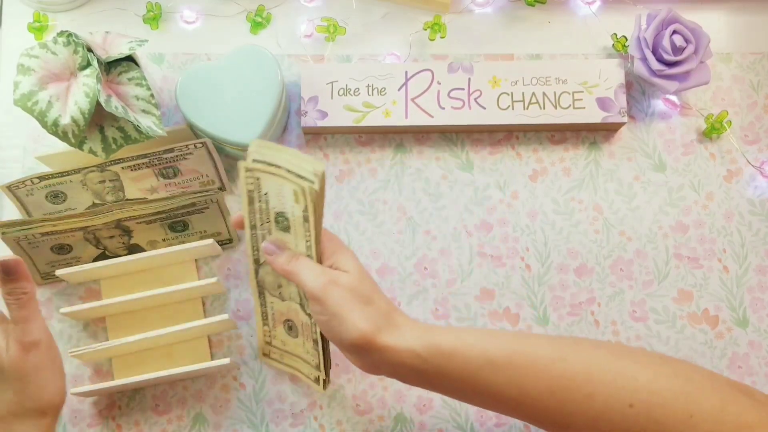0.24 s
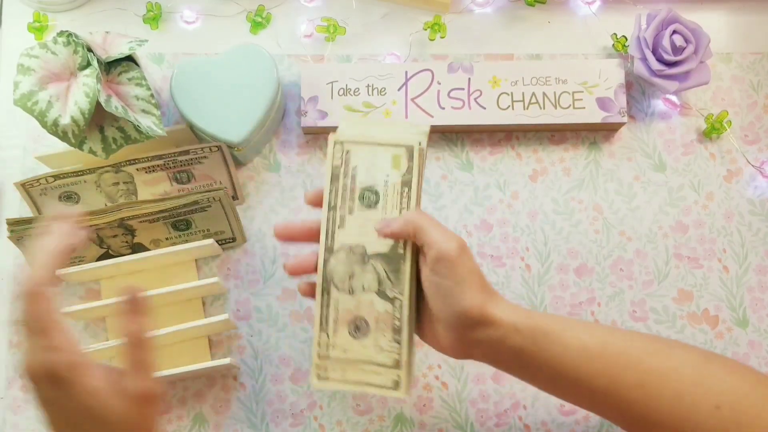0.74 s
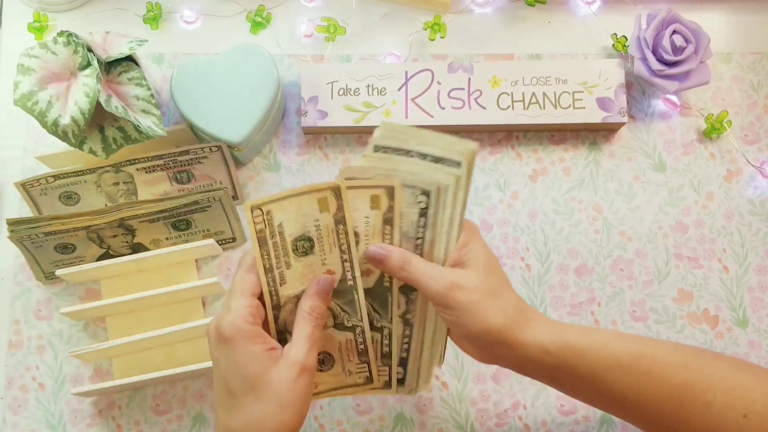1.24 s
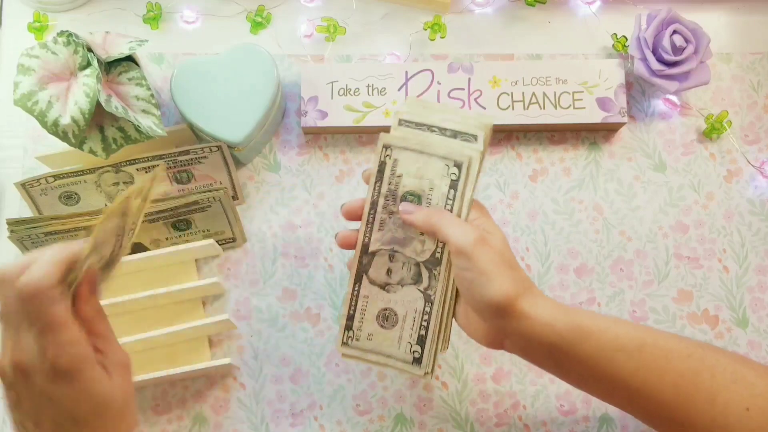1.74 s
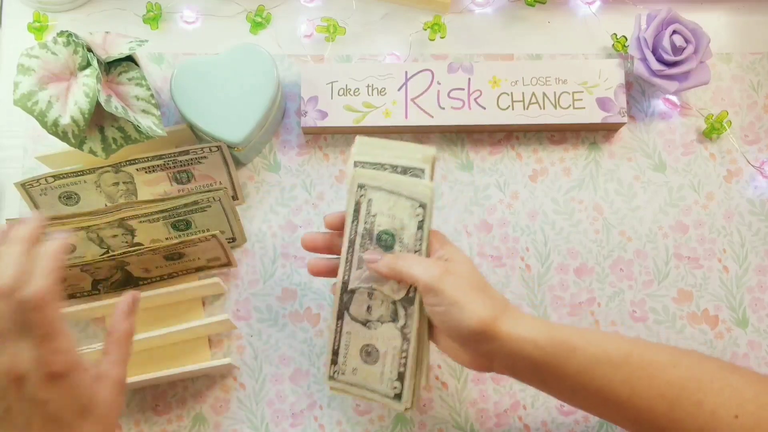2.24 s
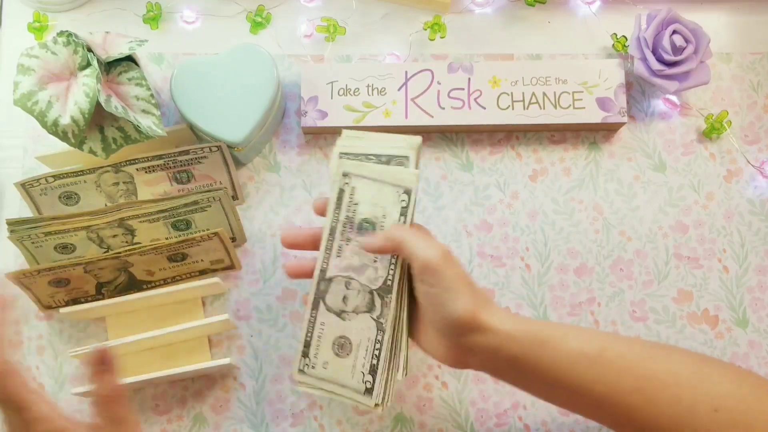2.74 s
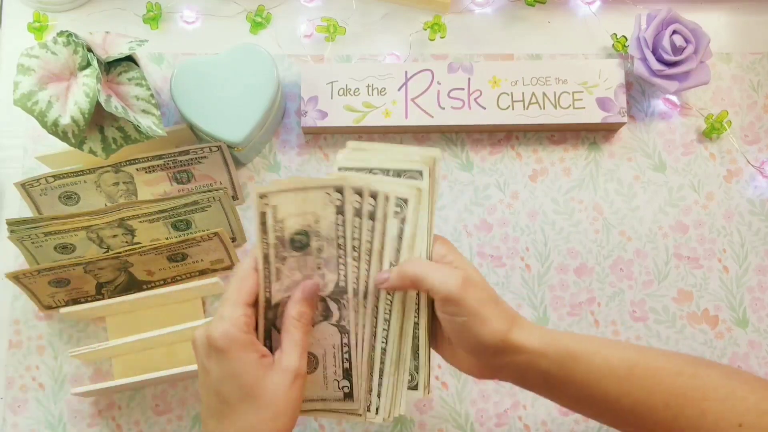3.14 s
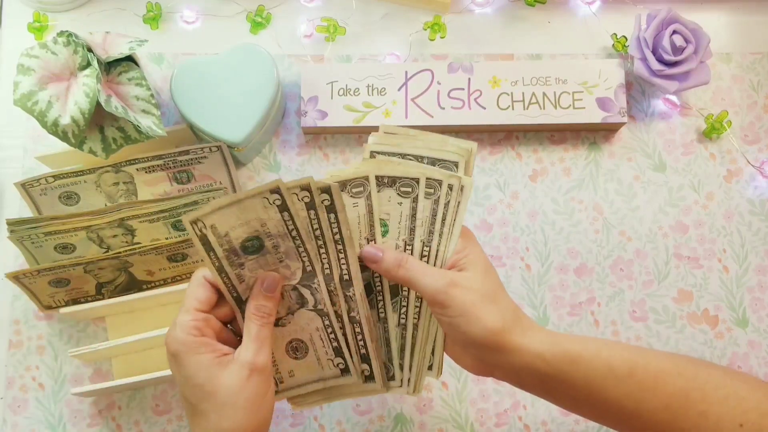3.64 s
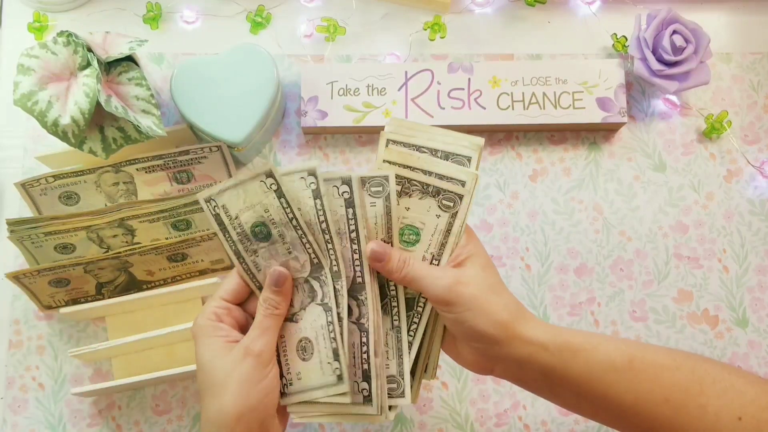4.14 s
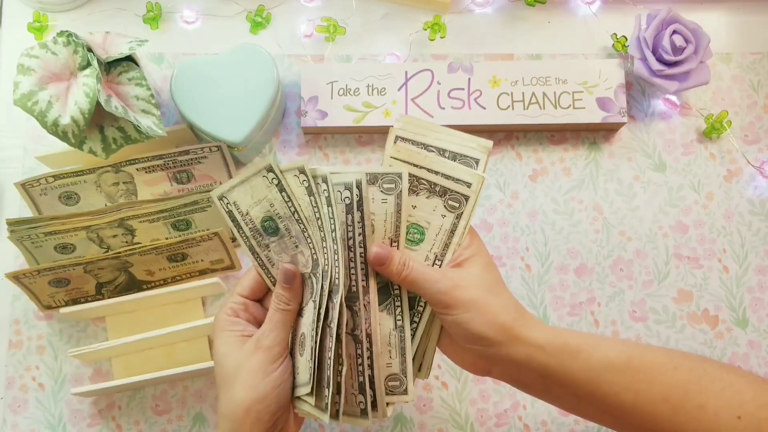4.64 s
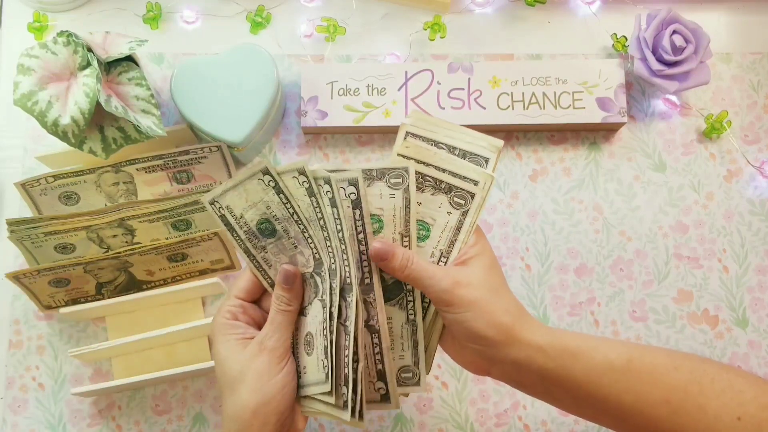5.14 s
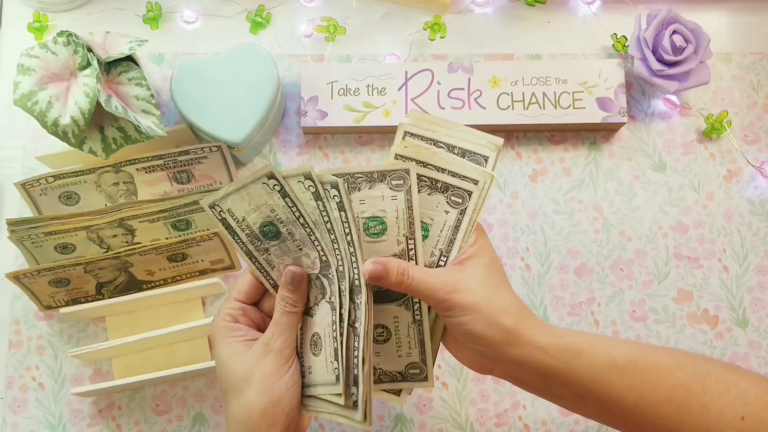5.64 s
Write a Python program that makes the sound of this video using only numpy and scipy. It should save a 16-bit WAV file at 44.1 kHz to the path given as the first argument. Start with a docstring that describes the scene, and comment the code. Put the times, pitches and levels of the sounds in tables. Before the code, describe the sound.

Close, quiet handling of paper money: dry rubs, a few soft table bumps, sharp little paper flicks, and a low fan-like hum behind.

```python
"""Hands fan out paper banknotes and drop some into a rack, close to a stereo microphone in a small room.
Throughout lie rumble, wavering hum and hiss, made of filtered noise and sines. First come faint slides and rubs:
friction as grainy, filtered noise. From 0.5 s to 0.9 s a hand bumps and brushes the table (damped sines, resonant
slips), with one thin tick. From 1.1 s sheets also snap, as struck resonances with a broadband crack: in bursts
near 1.6 s, 2.2 s and 4.1 to 4.5 s, and a last time at 5.8 s, while slides go on between them."""
import sys
import numpy as np
from scipy import signal
from scipy.fft import rfft, irfft
from scipy.io import wavfile

SR = 44100
rng = np.random.default_rng(int(sys.argv[2]) if len(sys.argv) > 2 else 0)


def generate_wav(sig):
    """Save sig (samples, or channels by samples) to the path in sys.argv[1] as 16-bit PCM at SR."""
    pcm = np.round(np.clip(np.atleast_2d(sig).T, -1, 1) * 32767).astype(np.int16)
    wavfile.write(sys.argv[1], SR, pcm)


N = 260190  # length in samples

# Filter spectrum of the fan-like rumble: (frequency [Hz], gain [dB])
RUMBLE_SPECTRUM = [(15, -20.5), (32, -34.5), (42, -18), (54, 0), (68, -0.5), (85, -13.5), (135, -15.5),
                   (190, -29.5), (255, -22.5), (370, -39.5), (700, -43), (1500, -51), (5000, -65)]
# Steady hum lines: (frequency [Hz], level [dB])
HUM_LINES = [(60, -61.5), (120, -65), (258, -78)]
# Filter spectrum of the microphone hiss: (frequency [Hz], gain [dB])
HISS_SPECTRUM = [(200, 20), (1000, -22), (3500, -11), (8500, -13), (12500, 8.5), (15000, 2)]
# Filter spectrum of the band of hiss in the left port: (frequency [Hz], gain [dB])
PORT_HISS_SPECTRUM = [(900, -32.5), (1400, -12.5), (2050, -4), (2400, -13.5), (2900, -29), (4000, -32)]
# Colour difference of the two microphone ports: (frequency [Hz], left minus right [dB])
PORT_DIFFERENCE = [(700, 1.5), (1300, 1), (2200, 8), (3100, 4), (4200, 1), (6000, -6), (8500, -4.5),
                   (14000, -1)]

# Soft bumps of hand and notes on the table: (time [s], relative level [dB], pitch [Hz])
TABLE_BUMPS = [(.515, -44.5, 160), (.640, -45.5, 260), (0.663, -53, 334), (0.716, -56.5, 340),
               (0.765, -47, 203), (2.122, -47, 193), (2.67, -52, 160), (3.905, -51.5, 168)]
# Ring of the table top: (frequency [Hz], width [Hz], gain [dB])
TABLE_MODES = [(1320, 100, -8)]
# The hand brushes along the table: (time [s], level [dB], pitch factor [1])
BRUSH_PATH = [(.62, -73, 0.87), (.645, -56, 0.96), (.70, -65, 0.89), (.745, -63, 0.96), (.79, -58.5, 0.96),
              (.85, -56, 1.07), (.885, -61.5, 1.12), (.94, -83, 0.77)]
# Resonances of the brushing: (frequency [Hz], width of each of two passes [Hz], gain [dB])
BRUSH_RESONANCES = [(466, 310, 0), (735, 400, -2), (1400, 310, 4.5), (2100, 400, -15), (3170, 360, -5)]

# A finger rubs one sheet: (middle [s], level at the middle [dB], pitch [Hz], time from middle to 1/e [s])
FINGER_RUBS = [(0.21, -62, 1490, 0.028), (0.532, -60.5, 1160, 0.025), (0.798, -57.5, 1110, .02),
               (1.098, -55.5, 900, 0.0095), (1.639, -52, 680, 0.023), (2.09, -60.5, 700, .028),
               (2.176, -49.5, 1040, .022), (2.191, -48, 570, 0.045), (4.416, -48, 650, .014),
               (5.68, -63.5, 845, 0.027), (5.819, -49.5, 694, 0.014)]
# A sheet snaps: (time [s], relative level [dB], pitch of the sheet [Hz], relative crack level [dB], decay [s])
SHEET_SNAPS = [(1.0707, -30.5, 2240, -8.5, 0.00072), (1.626, -26, 1930, -10, 0.00089),
               (1.629, -27, 2520, -7.5, 0.0021), (1.6412, -30, 2300, -4, 0.00072),
               (1.6655, -28.5, 2600, -23, 0.0043), (1.753, -43, 2260, -7.5, 0.0044),
               (2.053, -47, 1700, -20, .003), (2.1208, -34, 2100, -3.5, 0.0031),
               (2.154, -29, 1890, -5, 0.0019), (2.1782, -26, 2100, -16, 0.0024),
               (2.198, -22, 1930, -6, 0.0014), (2.6854, -37, 1400, -3.5, 0.0017),
               (3.3676, -41.5, 2000, -13, 0.00093), (3.825, -47, 1470, -14, .0025),
               (3.944, -36.5, 2500, -1, 0.00068), (4.0966, -26, 2350, -6.5, .0018),
               (4.1732, -22, 1700, -36, .0011), (4.183, -19.5, 1440, -23, 0.00056),
               (4.3536, -29, 2550, -19.5, 0.001), (4.3744, -23, 2320, -14, 0.0018),
               (4.397, -32, 1400, -23, .0014), (4.4042, -20, 1850, -9.5, 0.0038),
               (4.4966, -26.5, 2040, -14.5, 0.0041), (5.804, -25, 1270, -8.5, 0.0019)]
# Filter spectrum of the crack in a snap: (frequency [Hz], gain [dB])
CRACK_SPECTRUM = [(300, 16), (1000, 0), (2500, 11), (4000, 13.5), (6500, 7.5), (8500, 4), (15000, -13)]

# One sheet slides over another:
# (time at full speed [s], time held [s], rustle strength [dB], crisp treble relative to it [dB])
SHEET_SLIDES = [(.172, 0.034, -61.5, 6.5), (.245, 0.037, -67.5, 3), (0.544, 0.014, -51, -2.5),
                (0.943, 0.078, -55.5, 3), (1.04, 0.073, -58, -7.5), (1.155, 0.02, -62, -5),
                (1.267, .085, -54, 0), (1.545, 0.086, -64, 1), (1.624, 0.031, -47, -2.5),
                (1.73, 0.01, -58.5, 4.5), (1.82, 0.058, -69.5, 2), (1.955, 0, -66.5, 2),
                (2.14, 0, -52.5, 4), (2.168, 0.027, -45, -0.5), (2.245, 0.0021, -55, 0.5),
                (2.577, 0.0069, -58.5, -2), (2.675, 0.027, -59, 1.5), (2.945, 0, -71, 8),
                (3.083, 0.0014, -63, 2.5), (3.3, .21, -74.5, 6), (3.665, 0.03, -67, 4),
                (3.785, 0.046, -68.5, 1.5), (3.943, .10, -60, 2), (4.094, 0.042, -59.5, 0),
                (4.279, 0, -69, 1.5), (4.376, 0, -52, -16), (4.412, 0, -44.5, -5),
                (4.495, 0.0034, -50.5, -5.5), (4.635, 0.0051, -71.5, 7.5), (4.92, 0.015, -66.5, 1.5),
                (5.16, 0.024, -65.5, 1), (5.321, 0, -65.5, 5.5), (5.368, 0.0052, -57, 1),
                (5.41, 0.00046, -61.5, -4), (5.515, 0.0046, -63, -4.5), (5.782, 0.017, -47, -2),
                (5.875, .03, -57, -2)]
# The held wad rustles as the fingers work on it: (start [s], end [s], strength before unevenness [dB])
WAD_HANDLING = [(0.597, 0.891, -68.5), (.95, 2.08, -67), (2.62, 4.87, -72), (5.37, 5.9, -73.5)]
# Filter spectrum of the rustle: (frequency [Hz], gain [dB])
RUSTLE_SPECTRUM = [(120, -27.5), (300, 1.5), (580, 2.5), (850, 1), (1400, 1.5), (2200, 5.5), (3000, -7.5),
                   (4500, -3.5), (8000, -46.5)]
# Filter spectrum of the crisp fibre hiss: (frequency [Hz], gain [dB])
CRISP_SPECTRUM = [(1200, -19), (3000, 1.5), (4500, 4), (7000, 2), (10000, 2), (13000, 4.5), (15000, -5.5)]
# Creases that tick as the sheets bend: (frequency [Hz], width [Hz], gain [dB])
CREASE_MODES = [(1050, 65, -2), (1700, 1400, -8), (2500, 160, 2.5), (3500, 280, -16.5), (5200, 1200, -19)]

RISE_DB_PER_S, FALL_DB_PER_S = 437, 243  # a slide starts faster than it dies away
# handling: treble relative to its rustle [dB], spread of its unevenness [dB], changes per second
HANDLING_CRISP_DB, FIDGET_DB, FIDGET_RATE = 0.5, 0.7, 24
# rustle that a snap shakes out of its sheet: strength offset, relative treble, decay
SHIVER_DB, SHIVER_CRISP_DB, SHIVER_S = 1, -10, 0.019
SHEET_HZ, SHEET_DB = 2630, -6.5  # broad note of a sliding sheet, relative to the rustle strength
TICK_S, TICK_DB, TICK_DECAY_S = 0.738, -45.5, 0.0016
TICK_HZ, TICK_WIDTH_HZ = 12600, 3200  # pitch, and width of each of two passes
ROOM_T60_S, ROOM_DB, DESK_DB = 0.29, -14.5, -6  # tail decay; energy of tail and of early reflections
TOP_HZ = 14800  # edge of the recorder's low-pass

LEFT_MINUS_RIGHT = np.array([[1], [-1]])


def undb(db):
    """Logarithmic level: decibels to amplitude gain."""
    return np.exp(np.asarray(db) * (np.log(10) / 20))


def unit(x):
    """Effective value: scale to rms 1."""
    return x / np.sqrt(np.mean(x ** 2))


def curves(rows):
    """Linear interpolation: the columns of a table, joined by straight lines in time."""
    s, *columns = np.transpose(rows)
    return [np.interp(np.arange(N) / SR, s, c) for c in columns]


def colour(x, points):
    """Minimum-phase filtering: a causal filter whose spectrum joins (Hz, dB) points."""
    size = 16384
    hz, db = np.transpose(points)
    grid = np.maximum(np.fft.rfftfreq(size, 1 / SR), 1)
    gain = undb(np.interp(np.log(grid), np.log(hz), db))
    # folding the cepstrum onto positive times makes the response causal
    cepstrum = irfft(np.log(gain))
    cepstrum[1:size // 2] *= 2
    cepstrum[size // 2 + 1:] = 0
    response = irfft(np.exp(rfft(cepstrum)))
    return signal.fftconvolve(np.atleast_2d(x), response[None], axes=1)[:, :x.shape[-1]]


def resonate(x, modes):
    """Modal superposition: sum of resonances (Hz, width Hz, dB)."""
    return sum(undb(db) * signal.lfilter(*signal.iirpeak(hz, hz / width, fs=SR), x)
               for hz, width, db in modes)


def resonate_twice(x, mode):
    """Cascaded resonance: a second pass at the same gain steepens the flanks."""
    return resonate(resonate(x, [mode]), [mode])


def noise(side_db):
    """Partial coherence: stereo noise with a given share that differs between left and right."""
    mid, side = rng.standard_normal((2, N))
    return unit(mid + undb(side_db) * side * LEFT_MINUS_RIGHT)


def walk(rate):
    """Slow random modulation: chance values, rate per second, joined by lines and scaled to rms 1."""
    knots = rng.standard_normal(4096)
    return unit(np.interp(np.arange(N) / SR * rate, np.arange(len(knots)), knots))


def fade(start, decay_s):
    """Impulsive excitation: a very quick rise, then an exponential fall."""
    age = np.maximum(np.arange(N) / SR - start, 0)
    return (1 - np.exp(-age / 0.0002)) * np.exp(-np.minimum(age / decay_s, 20))


def crackle(spread_db, grain_s):
    """Stick-slip: fibres catch and let go in decaying grains of random time and size."""
    count = 9000
    size = undb(spread_db * np.minimum(rng.exponential(size=count), 5))
    grains = np.bincount(rng.integers(0, N, count), size, N)
    return unit(signal.lfilter([1], [1, -np.exp(-1 / (grain_s * SR))], grains))


def rumbling():
    """Partially coherent noise: a fan-like rumble, mostly shared by both channels in the bass."""
    shared = unit(colour(rng.standard_normal(N), RUMBLE_SPECTRUM))
    apart = unit(colour(rng.standard_normal(N), RUMBLE_SPECTRUM))
    apart = colour(apart, [(60, -22.5), (130, -12.0), (300, -8.0), (800, 1.0)])
    return undb(-51.5) * (shared + apart * LEFT_MINUS_RIGHT)


def humming():
    """Random modulation: sine lines waver slowly in phase and strength."""
    t = np.arange(N) / SR
    hum = 0
    for hz, db in HUM_LINES:
        line = np.sqrt(2) * np.sin(2 * np.pi * hz * t + 0.93 * walk(5))
        hum = hum + undb(db) * line * (1 + 0.26 * walk(8.1))
    return hum


def hissing():
    """Stationary noise: even hiss, independent in each channel, and a band of hiss in the left port."""
    hiss = undb(-69.5) * unit(colour(rng.standard_normal((2, N)), HISS_SPECTRUM))
    port = undb(-60.0) * unit(colour(rng.standard_normal(N), PORT_HISS_SPECTRUM))
    return hiss + port * np.array([[1], [0]])


def background():
    """Superposition: rumble, hum and hiss add up to the steady background."""
    return rumbling() + humming() + hissing()


def tick():
    """Impulsive band noise: one tiny tick, high in the treble."""
    band = (TICK_HZ, TICK_WIDTH_HZ, 0)
    return undb(TICK_DB) * fade(TICK_S, TICK_DECAY_S) * unit(resonate_twice(noise(side_db=1), band))


def bumping():
    """Impact excitation: each soft bump gives a damped sine thud and rings the table top."""
    t = np.arange(N) / SR
    contact, bumps = rng.standard_normal(N), 0
    for s, db, hz in TABLE_BUMPS:
        blow = fade(s, decay_s=0.0061)
        thud = blow * np.sin(2 * np.pi * hz * (t - s))
        ring = resonate(contact * blow, [*TABLE_MODES, (hz, hz, -4)])
        bumps = bumps + undb(db) * (1.6 * thud + undb(8) * ring)
    return bumps


def brushing():
    """Stick-slip with speed-dependent pitch: small slips excite resonances that shift with the hand's speed."""
    t = np.arange(N) / SR
    db, pitch = curves(BRUSH_PATH)
    slips = noise(side_db=-19) * crackle(spread_db=0.5, grain_s=0.0021)
    drag = 0
    for hz, width, mode_db in BRUSH_RESONANCES:
        once = resonate(slips, [(hz, width, 0)])
        drag = drag + resonate(once, [(hz, width, mode_db)])
    # reading the sound faster or slower moves its pitch
    position = np.cumsum(pitch)
    drag = np.array([np.interp(position, np.arange(N), channel) for channel in unit(drag)])
    touching = (t > BRUSH_PATH[0][0]) & (t < BRUSH_PATH[-1][0])
    return drag * undb(db) * touching


def rubbing():
    """Friction-driven resonance: dense slips of skin on paper swell and fade in one note of the sheet."""
    t = np.arange(N) / SR
    slips = noise(side_db=-28) * crackle(spread_db=-3.0, grain_s=0.002)
    out = 0
    for s, db, hz, half_s in FINGER_RUBS:
        note = unit(resonate_twice(slips, (hz, hz * 0.87, 0)))
        swell = np.exp(-np.minimum(((t - s) / half_s) ** 2, 20))
        out = out + undb(db) * note * swell
    return out


def snapping():
    """Buckling: a kick and short flutter excite a broad, quickly damped note, with a sharp crack."""
    flutter, notes, edge = noise(side_db=-3.5), np.zeros((2, N)), 0
    sheet_band = signal.butter(4, [520, 3000], "band", fs=SR, output="sos")
    count = 2400  # samples computed per note
    for s, db, hz, crack_db, decay_s in SHEET_SNAPS:
        part = slice(int(s * SR), int(s * SR) + count)
        blow = fade(s, decay_s)
        kick = blow[part] == blow[part].max()
        excitation = flutter[:, part] * blow[part] + 3 * kick
        note = resonate(excitation, [(hz, hz * 0.34, 0), (hz / 2, hz * 0.084, -6)])
        note = signal.sosfilt(sheet_band, note)
        blow_rms = np.sqrt(np.mean(blow[part] ** 2))
        notes[:, part] += undb(db - 3.0) * unit(note) * blow_rms
        edge = edge + undb(db + crack_db) * blow
    return notes + edge * unit(colour(noise(side_db=-2.0), CRACK_SPECTRUM))


def stroke(start, end):
    """Exponential growth and decay: a slide gathers speed, holds it and dies away."""
    t = np.arange(N) / SR
    level_db = [-RISE_DB_PER_S, 0, 0, -FALL_DB_PER_S]
    return undb(np.interp(t, [start - 1, start, end, end + 1], level_db))


def friction():
    """Addition of powers: slides, the handled wad and shivers after snaps drive rustle and crisp treble."""
    fidget = undb(FIDGET_DB * walk(FIDGET_RATE))
    moves = []
    for s, held_s, db, crisp_db in SHEET_SLIDES:
        moves.append((undb(db) * stroke(s, s + held_s), crisp_db))
    for start, end, db in WAD_HANDLING:
        moves.append((undb(db) * stroke(start, end) * fidget, HANDLING_CRISP_DB))
    # the more energy in a snap, the more its sheet shivers
    for s, db, _, _, decay_s in SHEET_SNAPS:
        shiver = undb(db + SHIVER_DB) * np.sqrt(decay_s) * fade(s, SHIVER_S)
        moves.append((shiver, SHIVER_CRISP_DB))
    rustle = sum(gain ** 2 for gain, _ in moves)
    crisp = sum((gain * undb(crisp_db)) ** 2 for gain, crisp_db in moves)
    return np.sqrt(rustle), np.sqrt(crisp)


def crinkling():
    """Impulse response: lone ticks ring creases, each at its own pitch; most are tiny, a few stand out."""
    out, count = 0, 700  # ticks per crease
    for crease in CREASE_MODES:
        size = undb(4.5 * np.minimum(rng.exponential(size=count), np.pi))
        size = size * rng.choice([-1, 1], count)
        impulses = np.bincount(rng.integers(0, N, count), size, N)
        out = out + resonate(impulses, [crease])
    return unit(colour(out, [(400, -18.0), (800, 2.5), (4000, 1.5), (9000, -15)]))


def sliding():
    """Dry friction: paper on paper rustles, rings, ticks and hisses, the balance shifting as it bends."""
    rustle, crisp = friction()
    grip = crackle(spread_db=3.5, grain_s=0.0048)
    bend_db = 0.55 * walk(35)
    grainy = unit(colour(noise(side_db=-8.5) * grip, RUSTLE_SPECTRUM))
    body = rustle * undb(bend_db - 3) * grainy
    # a crease can only give so much, however hard the sheet is pushed
    ticks = np.minimum(rustle, undb(-47.5)) * undb(-7.5) * crinkling()
    # the added constant keeps some hiss between the grains
    fibre_hiss = unit(colour(noise(side_db=0.5) * (grip + 0.61), CRISP_SPECTRUM))
    fibres = crisp * undb(-1.0 - bend_db / 2) * fibre_hiss
    sheet = (SHEET_HZ, SHEET_HZ * 0.7, 0)
    note = rustle * undb(SHEET_DB) * unit(resonate_twice(noise(side_db=0) * grip, sheet))
    return body + ticks + fibres + note


def room(x):
    """Reverberation: quick reflections off the table and things on it, then a short dull tail."""
    t = np.arange(SR // 2) / SR
    early, late = rng.standard_normal((2, 2, len(t)))
    early = early * np.exp(-t / 0.0046) * (t > 0.001)
    late = late * undb(-60 * t / ROOM_T60_S) * (t > 0.008)
    late = colour(late, [(300, 2), (2500, -9.5), (12000, -9)])
    response = (undb(DESK_DB) * unit(early) + undb(ROOM_DB) * unit(late)) / np.sqrt(len(t))
    return x + signal.fftconvolve(x, response, axes=1)[:, :N]


def ports(x):
    """Port resonance: the left port is stronger near 2 kHz, the right one is brighter."""
    channels = []
    for channel, sign in zip(x, (1, -1)):
        channels.append(colour(channel, [(hz, sign * db / 2) for hz, db in PORT_DIFFERENCE]))
    return np.vstack(channels)


def scene():
    """Superposition: paper and table in the room, a tick without room, over the steady background."""
    table = bumping() + brushing()
    in_room = room(table + rubbing() + snapping() + sliding())
    return background() + ports(tick() + in_room)


def record(dry):
    """Band limitation: the recorder cuts the top with a steep low-pass."""
    return signal.sosfilt(signal.ellip(10, 0.2, 70, TOP_HZ, fs=SR, output="sos"), dry)


dry = scene()
out = record(dry)
generate_wav(out)
```